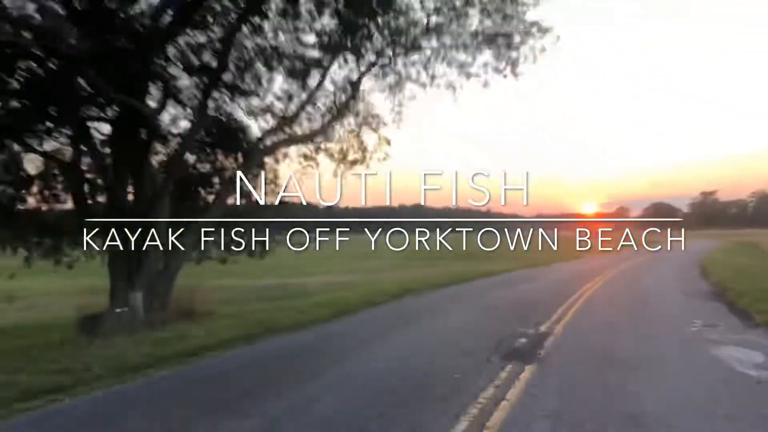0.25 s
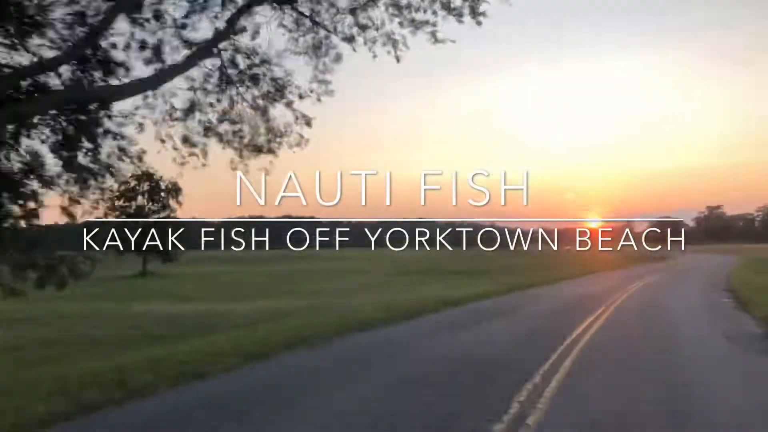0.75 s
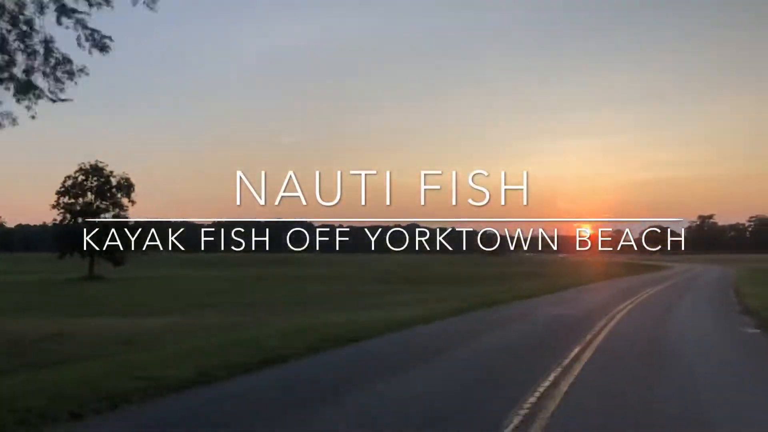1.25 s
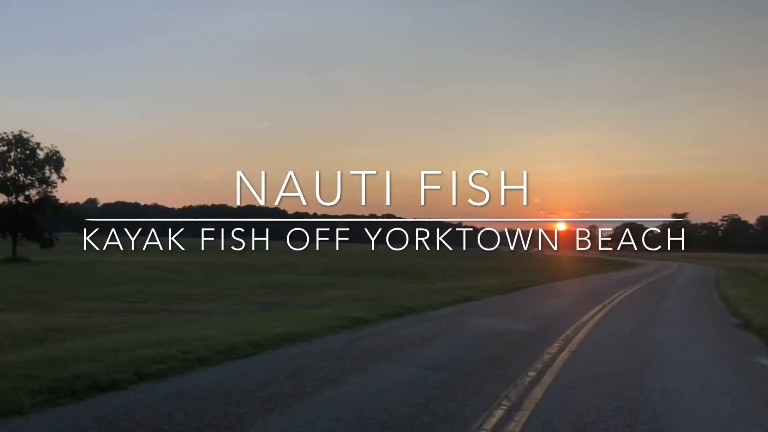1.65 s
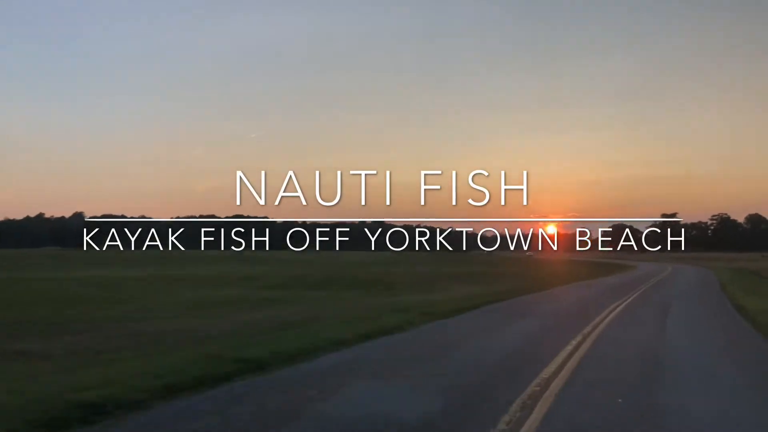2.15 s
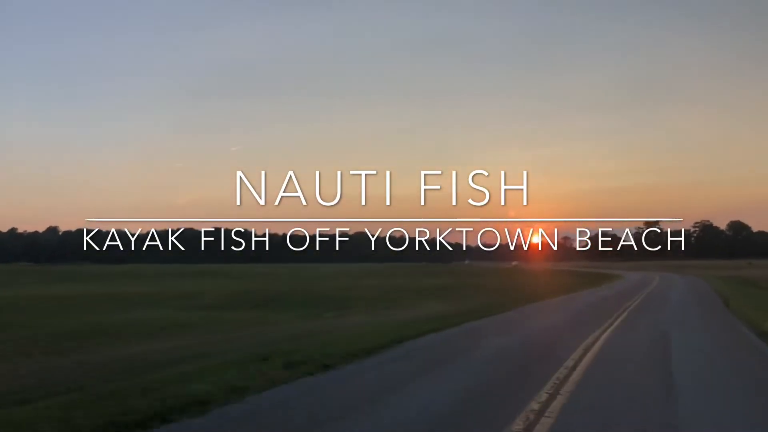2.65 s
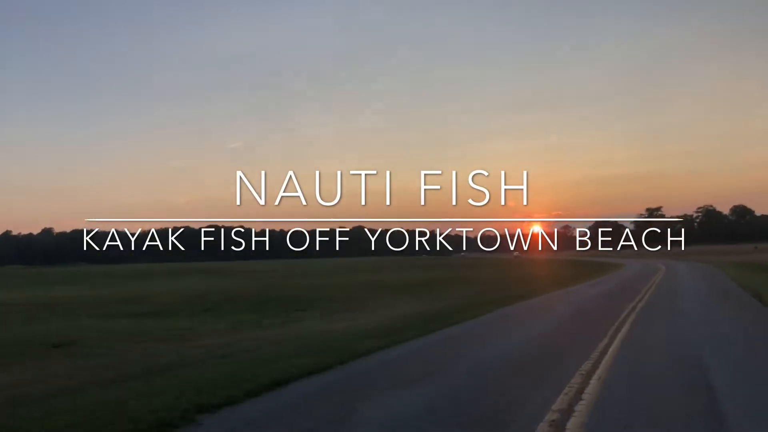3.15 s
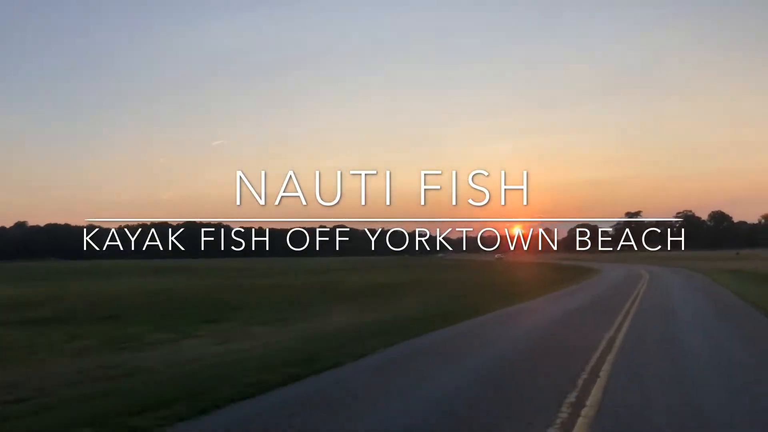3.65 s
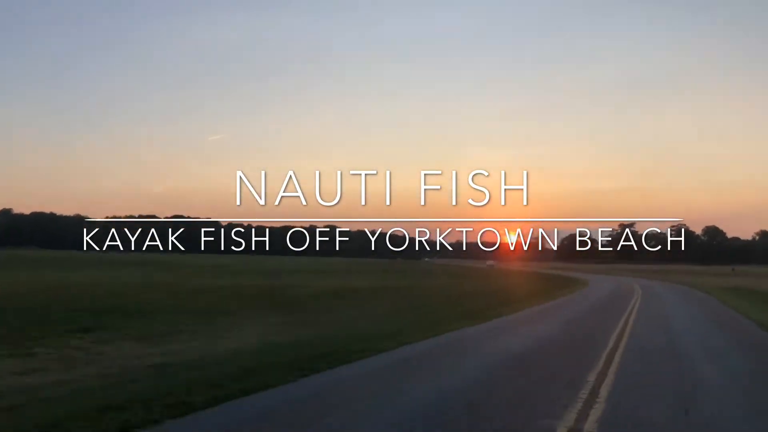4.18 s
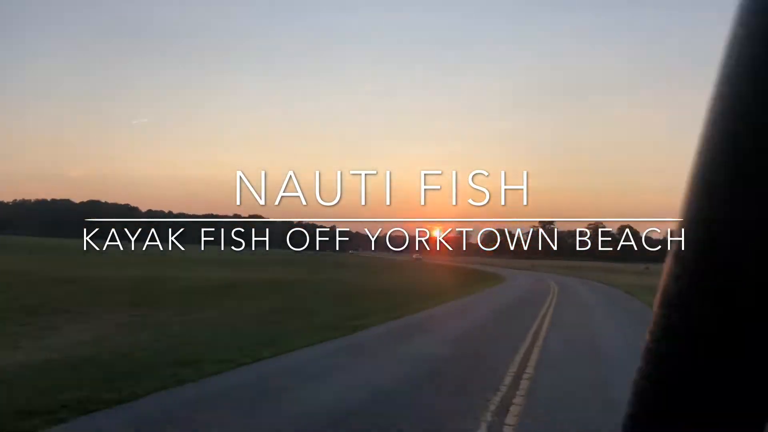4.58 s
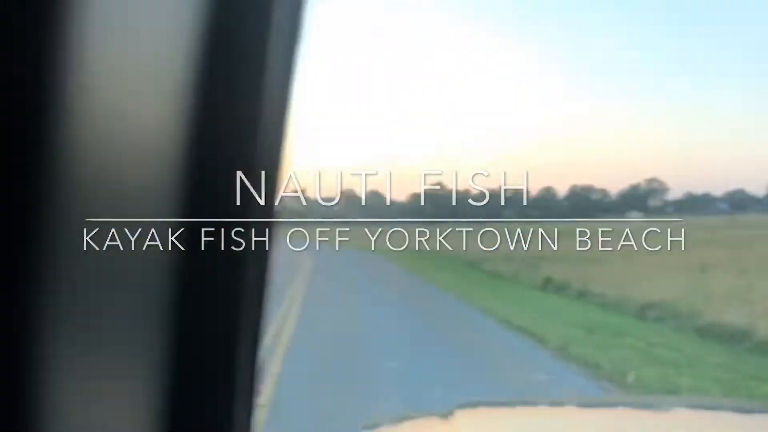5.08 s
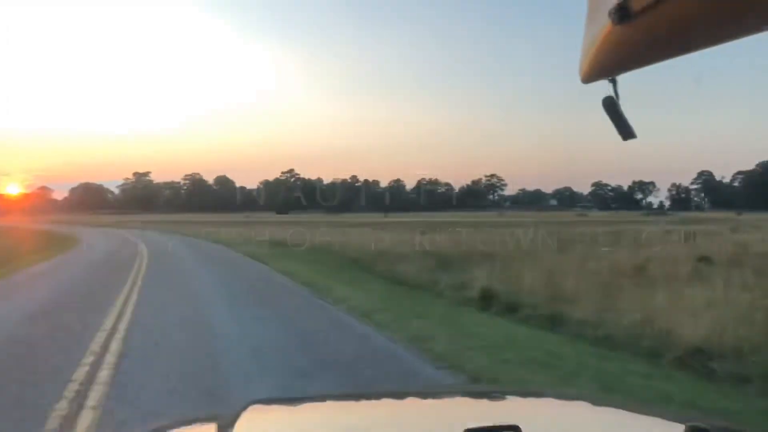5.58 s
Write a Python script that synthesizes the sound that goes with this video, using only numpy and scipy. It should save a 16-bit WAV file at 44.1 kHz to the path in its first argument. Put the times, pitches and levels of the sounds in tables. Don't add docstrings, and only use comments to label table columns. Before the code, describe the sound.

From 0 to about 2.3 seconds, fierce wind hits a handheld microphone outside a moving car. It is a loud, ragged flutter of low thumps, roughly 45 a second in uneven clusters, with crackling edges, overload and a flickering rush. The opening hit and blows near 0.9 and 1.6 seconds are especially hard; a few thin snaps occur in the first half second, and a tiny splice click near 1.7. At 2.3 the sound abruptly drops to softer, duller, bass-heavy wind bumps. Tyre roar and faint hiss grow, and gusts build to their strongest around 3.8 to 4.5 seconds, with sparse grit clicks, one clearer near 4.4. At about 4.9 the microphone moves behind the windscreen: wind disappears, leaving quiet, steady road rumble and slightly hollow tyre noise until about 5.8, with tiny dry trim ticks near 4.9, 5.3 and 5.7.

```python
import sys
import numpy as np
from scipy import signal
from scipy.fft import rfft, irfft, next_fast_len
from scipy.io import wavfile
from scipy.ndimage import uniform_filter1d, minimum_filter1d

SR = 44100
rng = np.random.default_rng(int(sys.argv[2]) if len(sys.argv) > 2 else 0)


def master(y):
    cut = np.clip(np.atleast_2d(y).T, -1, 1)
    pcm = np.round(cut * 32767)
    wavfile.write(sys.argv[1], SR, pcm.astype(np.int16))


def magnitude_from_level(level_db):
    exponent = np.asarray(level_db, float) / 20
    return 10 ** exponent


N = 256662
CHANGE_S, INDOORS_S = 2.293, 4.95
EDDY_SAMPLES = 4096

# (time [s], rumble level [dB])
BODY_WIND = [(2.31, -26), (2.34, -28.5), (2.43, -25.5), (3.4, -22), (3.7, -17), (4.08, -17), (4.45, -15.5),
             (4.77, -16), (4.94, -26), (4.96, -32), (5.32, -33.5), (5.34, -28.5), (5.45, -28.5),
             (5.49, -26.5), (5.56, -31), (5.62, -28), (5.66, -33), (5.71, -28.5), (5.82, -29)]
# (frequency [Hz], density [dB per Hz])
AIR_HISS = [(4800, -7), (5600, -7.5), (5900, -6.5), (6300, 0), (7500, -0.5), (8600, -4), (10300, -9),
            (11500, -9.5), (13500, -11), (16400, -18.5)]
# (frequency [Hz], density [dB per Hz])
GALE_EDDY = [(15, -47.5), (28, -13.5), (42, -18.5), (82, -2), (242, 0.5), (344, -0.5), (520, -6),
             (900, -14.5), (1610, -24), (3300, -46), (4400, -53.5), (5600, -64.5), (8500, -83),
             (16000, -87)]


def rms_one(x):
    return x / np.sqrt(np.mean(x ** 2) + 1e-20)


def in_time(rows):
    s, *columns = np.transpose(rows)
    return [uniform_filter1d(np.interp(np.arange(N) / SR, s, c), size=441) for c in columns]


def at_hz(points, hz):
    p = np.array(points, float)
    return np.interp(np.log(hz + 1e-3), np.log(p[:, 0]), p[:, 1], left=-90, right=-120)


def drift(rate):
    r = np.exp(-40 * np.pi * rate / SR)
    slow = signal.lfilter([1], [1, -2 * r, r * r], rng.standard_normal(N // 20 + 3002))[3000:]
    steps = np.interp(np.arange(N) / 20, np.arange(len(slow)), rms_one(slow))
    return uniform_filter1d(uniform_filter1d(steps, size=40), size=60)


def patchy_noise(spectrum, shared_db, own_db, rate):
    size = next_fast_len(N)
    hz = np.fft.rfftfreq(size, 1 / SR)
    coloured = rfft(rng.standard_normal(size)) * magnitude_from_level(at_hz(spectrum, hz))
    octave, together, out = np.log2(hz + 1e-3), drift(rate), 0
    lowest = np.floor(np.log2(spectrum[0][0]))
    for centre in np.arange(lowest, np.log2(spectrum[-1][0]) + 1):
        share = np.cos(np.pi / 2 * np.clip(octave - centre, -1, 1)) ** 2
        flicker_db = shared_db * together + own_db * drift(rate)
        out = out + irfft(coloured * share, size)[:N] * magnitude_from_level(flicker_db)
    return rms_one(out)


def resonate(x, hz, width_hz):
    r = np.exp(-np.pi * width_hz / SR)
    zeros = np.array([1, 0, -1]) * (1 - r * r) / 2
    return signal.lfilter(zeros, [1, -2 * r * np.cos(2 * np.pi * hz / SR), r * r], x)


def resonate_twice(x, hz, width_hz):
    return resonate(resonate(x, hz, width_hz), hz, width_hz)


def eddies(times, peak_db, colour_db, turns, scatter, smear_s, core_hz):
    size = EDDY_SAMPLES
    hz, lead = np.fft.rfftfreq(size, 1 / SR), size // 4
    octave = np.log2(hz + 20)
    chance = rng.standard_normal((len(times), 41))
    knots = np.linspace(octave[0], octave[-1], 19)
    wander = np.array([np.interp(octave, knots, c[:19]) for c in chance])
    lumps = np.array([np.interp(octave, knots, c[19:38]) for c in chance])
    sweep = turns * (1 + 0.2512 * chance[:, 38:39]) * 2 * np.pi * np.log(hz + 20)
    phase = -sweep + scatter * wander + 3 * chance[:, 39:40] - 2 * np.pi * hz * lead / SR
    ordered = 1 / (1 + (hz / core_hz) ** 2)
    core = irfft(magnitude_from_level(colour_db + 2.1 * lumps) * ordered * np.exp(1j * phase), size)
    nearing = magnitude_from_level(colour_db) * ordered ** 3 * np.exp(1j * (phase + 2 * sweep))
    core += 0.23 * irfft(nearing, size)
    t = (np.arange(size) - lead) / SR / (smear_s * magnitude_from_level(0.38 * chance[:, 40:]))
    t = np.where(t < 0, 2.13 * t, t)
    puff = rng.standard_normal(t.shape) * (np.exp(-t ** 2) + 0.27 * np.exp(-(t / 2.66) ** 2))
    puff = irfft(rfft(puff) * magnitude_from_level(colour_db) * np.sqrt(1 - ordered ** 2), size) / np.sqrt(smear_s * SR)
    shapes = (core + 0.91 * puff) * signal.windows.tukey(size, .45)
    out = np.zeros(N + 2 * size)
    for s, db, shape in zip(times, peak_db, shapes):
        at = size + round(s * SR) - lead
        out[at:at + size] += magnitude_from_level(db) * shape
    aligned_peak = np.max(np.abs(irfft(magnitude_from_level(np.mean(colour_db, axis=0)), size)))
    return out[size:size + N] / aligned_peak


def impulses(events, lift_db):
    clicks = np.zeros(N)
    for s, db in events:
        clicks[round(s * SR)] = magnitude_from_level(db + lift_db)
    return clicks


def tyre_levels():
    # (time [s], tyre roar level [dB])
    roar_curve = [(2.32, -46), (2.7, -45), (3.4, -41), (4.02, -36), (4.6, -36.5), (5.0, -40), (5.3, -41),
                  (5.56, -42.5), (5.82, -40.5)]
    roar_db, = in_time(roar_curve)
    indoors = np.clip((np.arange(N) / SR - INDOORS_S) / 0.23, 0, 1)
    hiss_db = -67 + 1.1 * (roar_db - roar_db.mean()) - 0.5 * indoors
    return roar_db, hiss_db


def road_rumble(indoors):
    # (frequency [Hz], density [dB per Hz])
    outside_spectrum = [(15, -44), (25, -22.5), (49, 3), (92, -1), (184, -3.5), (281, -10.5), (600, -28.5),
                        (780, -46), (1320, -120)]
    # (frequency [Hz], density [dB per Hz])
    cabin_spectrum = [(15, -37), (25, 3), (98, -1.5), (134, -1.5), (258, -10.5), (417, -15), (475, -18),
                      (800, -31), (1040, -52), (1760, -120)]
    rumble_db, = in_time(BODY_WIND)
    outside = patchy_noise(outside_spectrum, shared_db=-1.8, own_db=-0.5, rate=9.9)
    outside = outside + magnitude_from_level(1.5) * resonate(outside, 89.4, 30) / 3
    cabin = magnitude_from_level(4.2) * patchy_noise(cabin_spectrum, shared_db=-1.0, own_db=1.0, rate=32)
    return magnitude_from_level(rumble_db - .7) * (np.sqrt(1 - indoors) * outside + np.sqrt(indoors) * cabin)


def tyre_roar(indoors):
    # (frequency [Hz], density [dB per Hz])
    tread_spectrum = [(180, -34), (300, -11), (423, -8.5), (588, -12.5), (780, -12.5), (881, -11),
                      (1170, -19), (1570, -16), (2260, -35.5), (3390, -38.5), (3780, -41), (4380, -39),
                      (5600, -47), (7280, -77), (12300, -120)]
    # (frequency [Hz], width [Hz], level [dB])
    cavities = [
        (901, 80, 1),
        (1566, 340, -9),
        (3360, 550, -23),
        (4350, 470, -21),
        (4310, 106, -23),
        (4500, 200, -26),
    ]
    roar = patchy_noise(tread_spectrum, shared_db=1.0, own_db=-0.3, rate=17)
    white = rng.standard_normal(N) * magnitude_from_level(1.3 * drift(25))
    for hz, width_hz, db in cavities:
        roar = roar + magnitude_from_level(db + 13) * resonate_twice(white, hz, width_hz)
    cabin_shift = .5 * resonate(roar, 1100, 400) - 0.54 * resonate(roar, 850, 220)
    return rms_one(roar + indoors * cabin_shift)


def road():
    roar_db, hiss_db = tyre_levels()
    indoors = np.clip((np.arange(N) / SR - INDOORS_S) / 0.048 + .5, 0, 1)
    hiss = magnitude_from_level(hiss_db) * patchy_noise(AIR_HISS, shared_db=1.0, own_db=0.5, rate=20)
    return road_rumble(indoors) + magnitude_from_level(roar_db + 4.5) * tyre_roar(indoors) + hiss


def grit():
    # (time [s], peak level [dB])
    stones = [
        (2.6803, -56),
        (2.8948, -54),
        (3.699, -48),
        (4.3595, -40),
        (5.2915, -52),
        (5.66, -58),
        (5.772, -56),
        (5.783, -55),
    ]
    sand_per_s = 40
    struck = rng.random(N) < sand_per_s / SR
    _, hiss_db = tyre_levels()
    clicks = struck * rng.standard_normal(N) * magnitude_from_level(hiss_db - 3 + 18)
    for s, db in stones:
        clicks[round(s * SR)] = magnitude_from_level(db + 15.0)
    return resonate_twice(clicks, 8600, 6000)


def ticks():
    # (time [s], peak level [dB])
    knocks = [
        (3.899, -54),
        (4.873, -52),
        (4.9097, -60),
        (5.291, -52),
        (5.296, -52),
        (5.6616, -49),
        (5.683, -60),
        (5.752, -61),
        (5.768, -55),
    ]
    # (frequency [Hz], level [dB], 60 dB decay time [s])
    port_modes = [
        (4330, -4, .03),
        (4420, 2, 0.035),
        (7600, -10, .01),
        (3540, -4, .012),
        (4680, -3, 0.022),
    ]
    t = np.arange(2000) / SR
    ring = sum(magnitude_from_level(db - 60 * t / t60) * np.sin(2 * np.pi * hz * t) for hz, db, t60 in port_modes)
    onset = np.minimum(t / 0.0011, 1)
    return signal.fftconvolve(impulses(knocks, 7.0), ring * onset)[:N]


def faint_lee():
    per_s, below_db, spread_db = 24, -8, 3.5
    chance = rng.random((round(per_s * (INDOORS_S - CHANGE_S)) - 1, 2))
    s = CHANGE_S + (np.arange(len(chance)) + chance[:, 0]) / per_s
    body_db = np.interp(s, *np.transpose(BODY_WIND))
    return np.c_[s, body_db + below_db + 2 * spread_db * (chance[:, 1] - .5)]


def lee_wind():
    # (time [s], peak level [dB], brightness [dB])
    clear_eddies = [(2.323, -23.5, 3), (2.352, -17, -5.5), (2.377, -22, 7), (2.418, -18.5, 0.1),
                    (2.493, -25, -3), (2.548, -23, -2), (2.579, -17.5, 4), (2.604, -15, 6),
                    (2.647, -27, -4), (2.647, -15.5, 5), (2.681, -13, -3.5), (2.723, -27, 3.5),
                    (2.796, -22.5, 2), (2.859, -22, 0.1), (2.897, -25, 8), (2.938, -20, -1),
                    (2.981, -13.5, -1.5), (3.024, -14.5, -5), (3.124, -32, -1), (3.211, -18.5, 0.1),
                    (3.279, -14, 2), (3.329, -17, -5), (3.347, -20.5, 7), (3.392, -25, -6),
                    (3.431, -17.5, 2), (3.483, -17.5, 3), (3.519, -27, 3), (3.554, -13, 3), (3.587, -20, 2),
                    (3.642, -12, 3.5), (3.697, -10.5, 3), (3.783, -18, -8), (3.807, -21, 2), (3.835, -8, 4),
                    (3.865, -13.5, -4), (3.956, -17, 2), (3.978, -11.5, 1), (4.049, -5, -1.8),
                    (4.082, -14, -6), (4.156, -12, -4), (4.178, -7.5, -1), (4.209, -11, -1),
                    (4.29, -10, -1.5), (4.327, -11, 3.5), (4.368, -13.5, -1), (4.427, -12, -5),
                    (4.473, -14, -3), (4.552, -18, 0.1), (4.592, -12.5, 1.5), (4.658, -15.5, 0.1),
                    (4.696, -17, 4.5), (4.776, -12, -2.5), (4.878, -22, -4)]
    # (frequency [Hz], density [dB per Hz])
    lee_spectrum = [(15, -54), (25, -11), (48, -5), (87, 0.5), (275, -7), (450, -18), (647, -28.5),
                    (900, -37), (1170, -62), (1980, -120)]
    faint_eddies = np.pad(faint_lee(), ((0, 0), (0, 1)))
    s, peak_db, bright_db = np.transpose(np.r_[clear_eddies, faint_eddies])
    hz = np.fft.rfftfreq(EDDY_SAMPLES, 1 / SR)
    thin_db = -6.5 * np.clip(np.log2(230 / (hz + 1)), 0, 3)
    tilt = np.clip(np.log2((hz + 1) / 250), -1, 2)
    colour_db = at_hz(lee_spectrum, hz) + thin_db + bright_db[:, None] * tilt
    return eddies(s, peak_db + 3.0, colour_db, turns=1.4, scatter=0.64, smear_s=0.0044, core_hz=710)


def gale_bed():
    # (time [s], buffet level [dB], rush level over its rise [dB])
    gusts = [(0.0, -17, -0.5), (0.04, -18, .1), (0.27, -17, 2), (.45, -20, 3.5), (0.67, -15, 2),
             (0.69, -16, 4), (.85, -15.5, 0.5), (1.0, -16.5, -1.5), (1.15, -11.5, 3), (1.3, -15, 1.5),
             (1.45, -15, 1.5), (1.63, -11.5, 1.5), (1.72, -18, 5.7), (1.79, -14, .1), (1.95, -14, 4.5),
             (2.1, -15, -2), (2.28, -16, 4.3)]
    # (frequency [Hz], density [dB per Hz])
    buffet_spectrum = [(20, -29.5), (40, 3.5), (90, 2), (200, 0.5), (400, -17.5), (900, -28.5)]
    # (frequency [Hz], density [dB per Hz])
    rush_spectrum = [(120, -30), (200, -11), (465, -1), (1080, -16), (1610, -19.5), (2560, -37),
                     (3630, -42), (9000, -84.5), (11700, -113), (19800, -120)]
    buffet_db, swell_db = in_time(gusts)
    rush_db = -31.5 + 2 * np.arange(N) / SR + swell_db
    buffet = magnitude_from_level(buffet_db - 2.0) * patchy_noise(buffet_spectrum, shared_db=1.5, own_db=-3.0, rate=100)
    rush = magnitude_from_level(rush_db - 0.5) * patchy_noise(rush_spectrum, shared_db=9.0, own_db=2.0, rate=220)
    rush = rush + magnitude_from_level(-5.5) * resonate(rush, 3500, 600)
    hiss = patchy_noise(AIR_HISS, shared_db=4.0, own_db=0.5, rate=40)
    hiss = hiss + magnitude_from_level(5.6) * resonate_twice(hiss, 7500, 1100)
    return buffet + rush + magnitude_from_level(-83) * hiss


def stray_eddies():
    # (time [s], peak level [dB])
    strays = [(.303, -25), (0.316, -24), (.343, -21.5), (0.726, -16), (.746, -20), (1.004, -18),
              (1.016, -25), (1.089, -21.5), (1.18, -18), (1.229, -24), (1.316, -24), (1.377, -28),
              (1.459, -25), (1.612, -22), (1.667, -23.5), (1.698, -22.5), (1.719, -24), (2.185, -22)]
    s, peak_db = np.transpose(strays)
    hz = np.fft.rfftfreq(EDDY_SAMPLES, 1 / SR)
    low = np.clip(np.log2(1000 / (hz + 1)), 0, 1)
    colour_db = np.tile(at_hz(GALE_EDDY, hz) - 2.6 * low, (len(s), 1))
    return eddies(s, peak_db + 14.5, colour_db, turns=.8, scatter=.8, smear_s=.002, core_hz=1500)


def snaps():
    # (time [s], peak level [dB])
    crests = [
        (.010, -38.5),
        (.068, -50.5),
        (.132, -48),
        (.153, -49),
        (.352, -47),
        (.371, -40),
        (.533, -49),
        (.550, -51),
    ]
    return resonate_twice(impulses(crests, 9.5), 7000, 9000)


def shedding():
    # (first eddy [s], train length [s], first eddy peak [dB], followers' peak [dB])
    trains = [(0.010, .031, -6, -10), (0.068, .037, -17.5, -15), (0.132, .086, -12, -17.5),
              (0.254, .048, -6.5, -41), (0.327, .114, -14, -19.5), (0.469, .027, -18, -23),
              (0.512, .061, -15, -16), (0.590, 0.034, -23, -21), (0.656, .037, -16, -22.5),
              (0.735, .037, -14, -18.5), (0.81, .063, -21.5, -14), (0.905, .030, 2.5, -25),
              (0.952, .041, -19.5, -15.5), (1.022, .039, -17.5, -29), (1.083, .063, -12.5, -22),
              (1.17, .020, -12, -24), (1.217, .062, -21.5, -21), (1.305, .013, -16.5, -18),
              (1.345, .073, -20.5, -18), (1.448, .052, -17.5, -18.5), (1.521, .030, -13.5, -14.5),
              (1.572, .066, -8, -14.5), (1.666, .031, -24.5, -41.5), (1.730, .013, -22, -25),
              (1.771, .061, -17.5, -26), (1.857, .047, -27, -18.5), (1.931, .082, -15, -24.5),
              (2.046, .087, -12.5, -13.5), (2.156, .068, -27, -18), (2.242, .032, -23, -13)]
    # (time [s], peak level [dB])
    loners = [(0.289, -27.5), (0.717, -26), (0.789, -26), (.895, -30), (1.387, -25), (1.458, -23.5),
              (1.656, -24.5), (1.843, -20.5), (2.037, -18), (2.195, -25)]
    # (time [s], peak [dB], crackle over the usual [dB], body
    # over the usual [dB])
    special_eddies = [(.010, -8, 8, 4), (0.068, -12, -1, 2.5), (.153, -10, -1.5, 5.5), (.352, -13, 1.5, 3),
                      (0.372, -15, 5, 5), (0.47, -11, -7.5, 3.5), (.551, -13, 7.5, 1.5), (.589, -11, 3, 7),
                      (.631, -7.5, -3, 0.5), (.811, -10.5, -3.5, 0), (.855, -12, 1.5, 0), (.874, -9.5, -2, -3),
                      (.906, -10, 3, -3), (.994, -16, -2.5, -1.5), (1.059, -15, 2.5, -0.5), (1.346, -14, -2.5, 4),
                      (1.516, -13, -8.5, 1.5), (1.545, -20.5, 8.5, 4), (1.594, -14.5, 3, -1.5),
                      (1.618, -11, -1, -6), (1.771, -15.5, 0, 1.5), (1.791, -11.5, 3.5, 3), (1.814, -11, 6, 4),
                      (1.881, -11.5, 0, 2.5), (1.995, -16.5, 4.5, 0), (2.065, -9.5, 2, -10.5),
                      (2.086, -13.5, -4, -5.5), (2.131, -14.5, 4.5, -3.5), (.132, -11, 0, -2),
                      (.195, -20.5, -4.5, 4), (.326, -16, 2.5, 2), (.416, -16, 0, 4.5), (.432, -19, -4.5, 5.5),
                      (.608, -16.5, 4.5, -5), (.735, -12.5, -6, -1), (0.754, -19.5, -6, 4), (.935, -19.5, 0.5, 1),
                      (1.043, -20, 1, 1.5), (1.083, -13.5, -1.5, -2), (1.104, -18, 5, -4.5),
                      (1.146, -15, 1.5, 3.5), (1.189, -13, -4.5, -3.5), (1.281, -19.5, -1, 2.5),
                      (1.324, -20.5, -1, 1), (1.571, -1.5, -5.5, -5), (1.978, -18, 0, -3.5),
                      (2.036, -12, 0.5, -2.5), (2.158, -22, 0.5, -4.5), (2.227, -13, -1, 2), (2.275, -12, 0, 1),
                      (.039, -12.5, -2.5, 0), (0.086, -22.5, -2.5, 2), (0.219, -22, 2, 2),
                 (0.658, -14.5, -1, -3.5), (0.83, -16.5, 0.5, -0.5), (.971, -19, 4, -1),
                 (1.127, -20, 2, -3.5), (1.17, -20.5, 5, -2.5), (1.253, -24.5, 4.5, -9),
                 (1.4, -20.5, 1.5, 5), (1.637, -16, 4, 4.5), (1.745, -24.5, 2, 5.5),
                 (1.948, -21.5, 5, -3.5), (2.014, -19.5, -0.5, 0.5), (2.047, -14.5, -4, -0.5),
                 (2.114, -31, 1, 11.5), (2.178, -21, 4.5, 6.5), (2.201, -16.5, -3.5, -1),
                 (.254, -12.5, 0.5, 1.5), (0.443, -25, -2, 4.5), (.496, -21.5, 5.5, 4.5),
                 (.676, -29.5, 0, 0.5), (1.216, -21, -1, 1), (1.471, -17.5, 4.5, 2), (1.831, -19, -3.5, -4),
                 (2.242, -20.5, 2.5, -1)]
    shed_per_s, jitter_s, follower_spread_db = 45, .001, 1
    crackle_spread_db, body_spread_db = 2.5, 4
    rows = []
    for start, length, first_db, follow_db in trains:
        count = max(1, round(length * shed_per_s))
        rows.append((start, first_db, 0))
        for k in range(1, count + 1):
            rows.append((start + length * k / count, follow_db, 1))
    rows += [(start, peak_db, 0) for start, peak_db in loners]
    s, db, follows = np.transpose(rows)
    chance = rng.standard_normal((len(s), 4))
    table = np.c_[s + follows * jitter_s * chance[:, 0],
                  db + follows * follower_spread_db * chance[:, 1],
                  crackle_spread_db * chance[:, 2],
                  body_spread_db * chance[:, 3]]
    for special in special_eddies:
        nearest = np.argmin(np.abs(s - special[0]))
        table[nearest] = special
    return table.T


def fullness(times):
    # (time [s], level near 600 Hz [dB])
    middles = [(.039, 0), (.067, -4), (.132, 3.5), (.254, 1), (.326, 1), (.352, 4.5), (.372, 7),
               (.416, -3.5), (.47, 2.5), (.551, 4), (.589, 6), (.631, 5), (.735, 3), (.811, 3.2),
               (.855, -4), (.906, -2.2), (.994, 2.5), (1.043, -3.5), (1.059, -3.5), (1.083, -1.5),
               (1.103, 5), (1.147, -1.5), (1.189, -1.5), (1.281, 1), (1.346, 4.5), (1.401, -4),
               (1.471, -1.8), (1.516, 3.5), (1.571, 3.7), (1.617, -2), (1.637, 1), (1.771, 1), (1.791, -1),
               (1.881, -2), (1.978, 1), (2.036, -3), (2.086, 2), (2.131, -1), (2.227, -0.5), (2.275, 1)]
    extra_db = np.zeros(len(times))
    for s, db in middles:
        extra_db[np.argmin(np.abs(times - s))] = db
    return extra_db[:, None]


def gale_eddies():
    s, peak_db, crackle_db, extra_db = shedding()
    over_db = peak_db + 16
    body_db = -0.37 * over_db + extra_db
    spread_ms = (3.1 - 0.16 * over_db) * magnitude_from_level(-0.5 * rng.standard_normal(len(s)))
    smear_s = 0.0009 * np.clip(spread_ms, .6, 5)[:, None]
    hz = np.fft.rfftfreq(EDDY_SAMPLES, 1 / SR)
    deep = np.clip(np.log2(200 / (hz + 1)), 0, 1)
    low = np.clip(np.log2(1000 / (hz + 1)), 0, 1)
    middle = np.exp(-(np.log2((hz + 1) / 620) / .7) ** 2)
    high = np.clip(np.log2((hz + 1) / 1800), 0, 1)
    top = np.clip(np.log2((hz + 1) / 7000), 0, 1)
    colour_db = at_hz(GALE_EDDY, hz) + low * (body_db[:, None] + 0.81)
    colour_db = colour_db + high * (crackle_db[:, None] - .8) - 4.0 * top
    colour_db = colour_db + deep * (-2.5 - 0.43 * body_db[:, None]) + middle * fullness(s)
    return eddies(s - .0006, peak_db + 20.5, colour_db, turns=1.0, scatter=0.89, smear_s=smear_s, core_hz=1720)


def gale():
    return gale_eddies() + stray_eddies() + snaps() + gale_bed()


def scene():
    after = np.clip((np.arange(N) / SR - CHANGE_S) / 0.019 + .5, 0, 1)
    ride = lee_wind() + road() + ticks() + grit()
    return (gale() * (1 - after) + ride * after)[None]


def top_cut(x):
    return signal.sosfilt(signal.butter(12, 15830, fs=SR, output="sos"), x)


def record(dry):
    x = signal.sosfilt(signal.butter(4, 36, "high", fs=SR, output="sos"), dry)
    room = minimum_filter1d(np.minimum(1, .994 / (np.abs(x) + 1e-9)), size=161)
    x = x * uniform_filter1d(uniform_filter1d(room, size=81), size=81)
    t = np.arange(N) / SR
    x = x * np.clip(0.67 + t / 0.0061, 0, 1)
    x = x * np.clip((t[-1] - t) / .002, 0, 1)
    step_s, step_height, step_decay_s = 1.7033, 0.145, 0.0005
    x = x + step_height * np.sign(t - step_s) * np.exp(-np.abs(t - step_s) / step_decay_s)
    low_pass = signal.cheby2(14, 30, 15740 + 250, fs=SR, output="sos")
    x = signal.sosfiltfilt(low_pass, x, padlen=2000)
    return top_cut(np.clip(x, -1, 1))


dry = scene()
out = record(dry)
master(out)
```